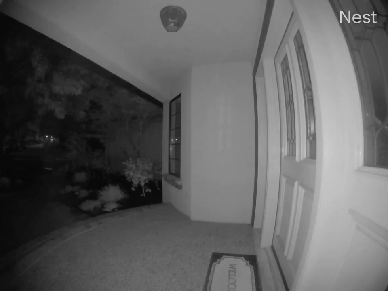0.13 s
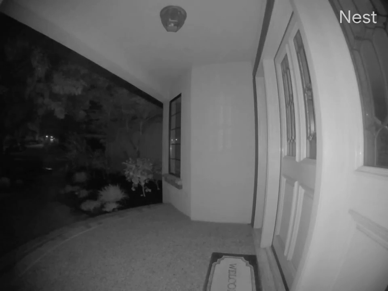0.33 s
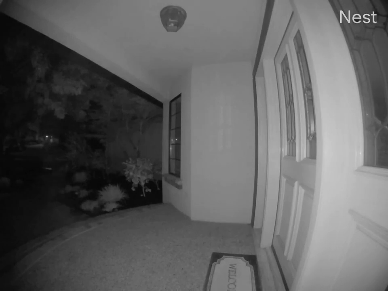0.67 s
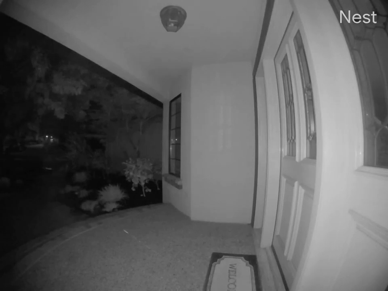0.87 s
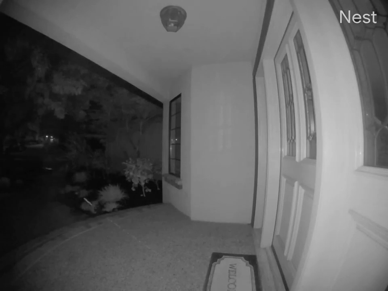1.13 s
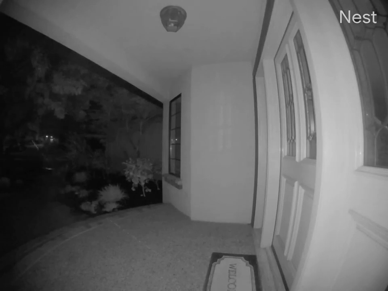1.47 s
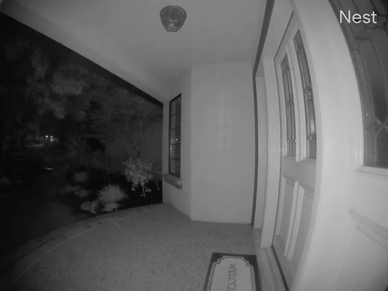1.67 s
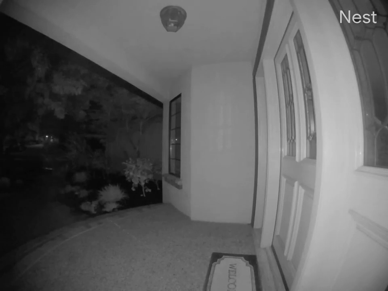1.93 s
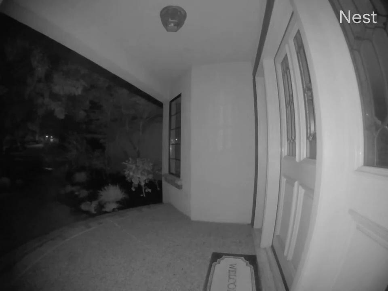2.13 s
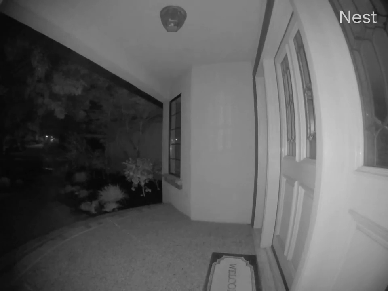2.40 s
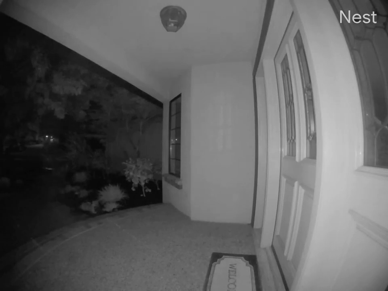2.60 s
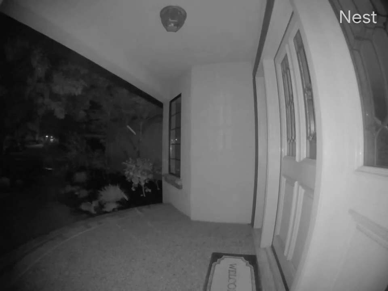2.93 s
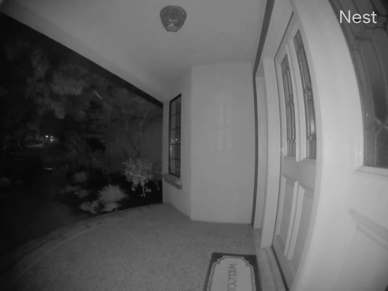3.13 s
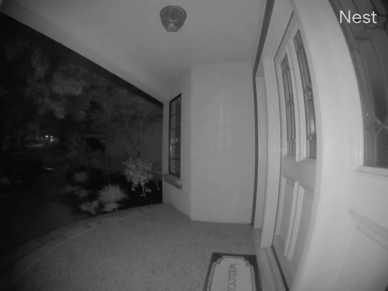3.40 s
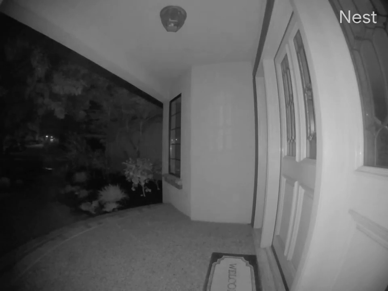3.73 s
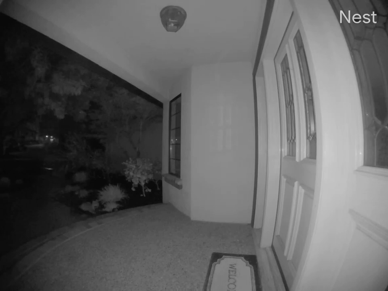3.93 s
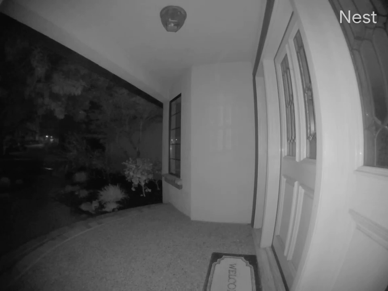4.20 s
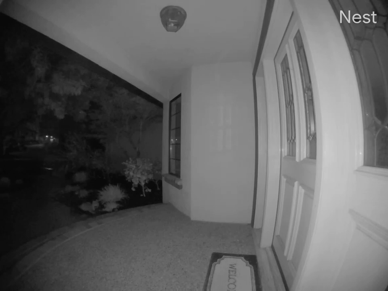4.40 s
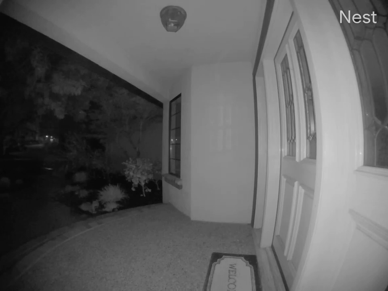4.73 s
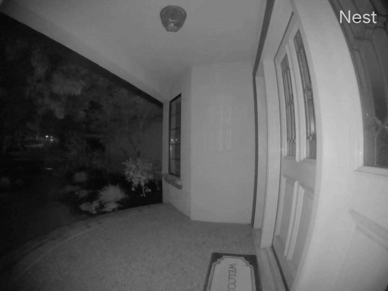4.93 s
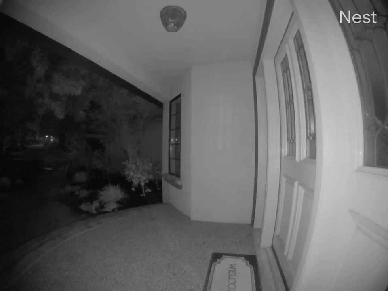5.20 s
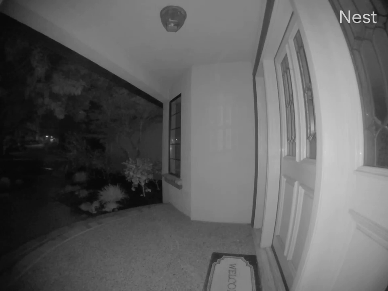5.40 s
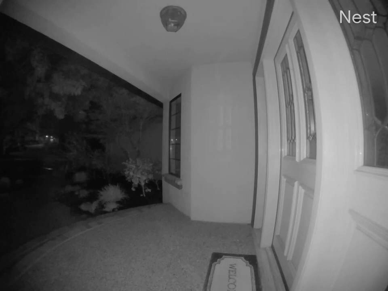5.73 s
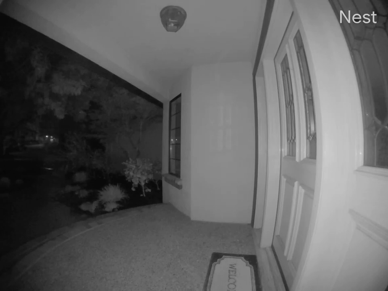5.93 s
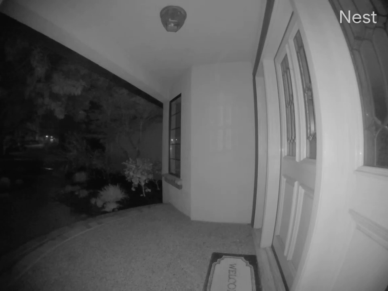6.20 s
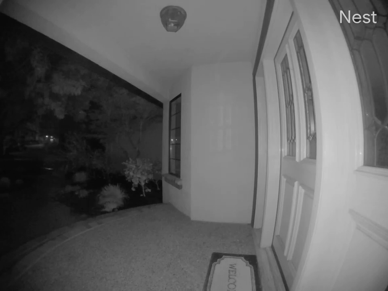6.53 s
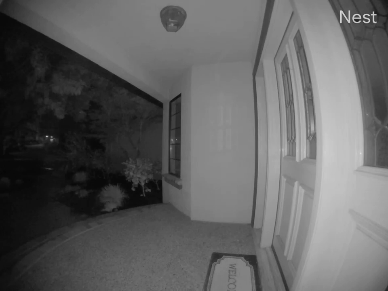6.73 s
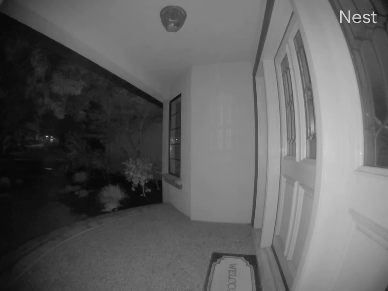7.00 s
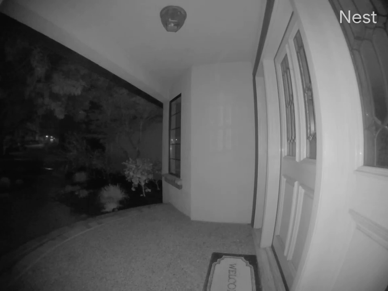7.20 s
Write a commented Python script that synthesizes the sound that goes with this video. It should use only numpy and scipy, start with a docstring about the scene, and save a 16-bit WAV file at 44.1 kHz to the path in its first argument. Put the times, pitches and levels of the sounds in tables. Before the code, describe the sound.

Two cats face off outdoors, one yowling in long arches that break into hoarse screams, the other answering lower and duller.

```python
"""Front garden at night, heard from a hard-walled porch through a narrow-band microphone.
Two cats face off: the near one yowls in long arches that break into hoarse screams, the other
answers lower and duller. Vocal folds make overtones and air puffs, throat and mouth colour them,
and the two lowest tones sound through the chest. Faint murmurs, ticks, hisses and a spit sit over
a low background rumble, and the porch adds a short echo to the cats."""
import sys
import numpy as np
from scipy import signal
from scipy.io import wavfile
from scipy.ndimage import uniform_filter1d, map_coordinates

SR = 44100
rng = np.random.default_rng(int(sys.argv[2]) if len(sys.argv) > 2 else 0)


def to_wav(s):
    """Save 16-bit WAV."""
    ch = np.atleast_2d(s).T  # columns
    pcm = np.round(np.clip(ch, -1, 1) * 32767)  # PCM
    wavfile.write(sys.argv[1], SR, pcm.astype(np.int16))


N = 324135

# near cat, one list per call: (time [s], effort [dB], pitch [Hz], mouth opening [0-1])
NEAR_CALLS = [
    [(0.0, -21, 554, 1), (0.06, -21, 538.4, 0.77), (0.105, -17.5, 555.3, 0.9), (0.2, -25, 517.3, 0.47),
     (0.29, -21.5, 542, 0.56), (0.376, -21.5, 556, 0.9), (0.46, -20.5, 534.7, 0.83), (0.54, -49, 573, 0.5)],
    [(0.86, -61.5, 344, 0.6), (0.954, -38, 333.7, 0.48), (1.08, -36, 436.2, 0.8), (1.268, -27.5, 476, 0.85),
     (1.36, -30, 483.4, 0.61), (1.658, -28, 498.5, 0.51), (1.71, -23, 474.4, 0.86),
     (1.754, -32.5, 463, 0.95), (1.76, -19, 465.4, 1), (1.783, -26.5, 480, 0.67),
     (1.797, -21.5, 512.2, 0.68), (1.845, -21.5, 506.7, 0.61), (1.865, -24.5, 487, 0.63),
     (1.904, -21.5, 482, 0.97), (1.964, -21.5, 476.6, 0.82), (2.076, -25.5, 457.8, 0.61),
     (2.152, -29, 422, 0.8), (2.21, -31, 380.6, 0.4), (2.33, -77.5, 326.5, 0)],
    [(3.05, -70.5, 351, .6), (3.098, -50.5, 379, 0.97), (3.262, -41, 421, 1), (3.384, -35.5, 437, 0.58),
     (3.544, -34, 445.2, 0.85), (3.766, -33.5, 462.5, 0.66), (3.82, -35, 455.8, 0.62),
     (4.126, -26, 470.4, 0.78), (4.214, -27, 464.3, 0.67), (4.238, -37, 459.3, 0.7), (4.268, -29, 460, 0.7),
     (4.344, -29, 442.2, 0.72), (4.432, -28.5, 423.3, 0.8), (4.46, -29, 400.4, 0.48),
     (4.49, -28.5, 360, 0.65), (4.55, -27, 329, 0.52), (4.606, -43, 285, 0.09), (4.68, -83.5, 256, 0)],
    [(4.99, -83, 340, 0.5), (5.016, -44.5, 348.4, 1), (5.084, -40.5, 405, 0.97), (5.186, -36.5, 451, 0.6),
     (5.354, -21, 549.6, 0.97), (5.44, -18, 601.7, 0.82), (5.5, -21, 605.6, 0.7), (5.61, -19, 599.4, 0.9),
     (5.908, -21.5, 616.4, 0.83), (5.984, -16, 604, 0.96), (6.02, -26.5, 602.4, 0.9),
     (6.08, -55, 618, 0.58)],
]
# other cat, one list per call: (time [s], effort [dB], pitch [Hz], mouth opening [0-1])
OTHER_CALLS = [
    [(6.325, -69, 327, 0.27), (6.345, -38.5, 331.4, 0.11), (6.418, -23, 351.8, 0.74),
     (6.516, -28, 400, 0.97), (6.62, -32.5, 394.7, 0.91), (6.66, -31, 405.7, 0.29),
     (6.69, -33.5, 406.4, 0.42), (6.71, -29.5, 404.7, 0.31), (6.735, -33.5, 404.7, 0.54),
     (6.776, -37.5, 342, 0.26), (6.8, -44, 338, 0.77)],
    [(6.8, -48, 334, 0.74), (6.83, -41.5, 323.4, 0.66), (6.876, -39.5, 339.5, 0.18), (6.9, -37, 335, 0.46),
     (6.92, -52, 319, 0.75), (6.96, -58, 308, 0.21)],
    [(7.27, -106, 305, 0.33), (7.302, -50, 305, 0.96), (7.35, -37.5, 319, 0.53)],
]
# second harmonic with clear folds, per near call: (level re effort [dB])
NEAR_SECOND_DB = [-10.5, -12, -9, -12.5]
# state of the vocal folds: (time [s], hoarseness [0-1])
HOARSENESS = [(0, .45), (.05, .45), (.09, .8), (.18, .75), (.33, .75), (.43, .8), (.52, .95), (.88, .7),
              (1.06, .35), (1.2, .08), (1.45, .04), (1.64, .03), (1.69, .45), (1.76, .25), (1.8, .18),
              (2.0, .22), (2.1, .3), (2.16, .55), (2.21, .8), (3.1, .6), (3.27, .05), (3.36, .006),
              (3.62, .004), (3.72, .18), (3.87, .15), (3.95, .1), (4.05, .22), (4.22, .2), (4.3, .45),
              (4.36, .35), (4.45, .45), (4.5, .85), (5.02, .55), (5.42, .55), (5.52, .9), (6.0, .9),
              (6.35, .65), (6.45, .88), (6.7, .75), (6.79, .7), (6.84, .45), (6.9, .45), (6.94, .8),
              (7.35, .45)]
# mouth and porch colour, near cat: (frequency [Hz], gain [dB])
NEAR_COLOUR = [(150, -21.5), (450, -10), (900, -6.5), (1400, -10), (1900, -12.5), (2350, -10.5),
               (2750, -9.5), (3400, -12), (4100, -15), (4800, -17.5), (6400, -19), (7400, -22)]
# mouth and porch colour, other cat: (frequency [Hz], gain [dB])
OTHER_COLOUR = [(150, -21), (350, 5), (550, 2), (1000, 0), (1350, 0), (2000, 1), (2600, -3.5), (3800, -11),
                (7400, -31)]
# brightness of the voices: (time [s], tilt [dB/octave])
VOICE_TILT = [(0, 7.5), (.2, -1), (.42, 2), (.54, -7.5), (.9, 1), (1.27, -2), (1.65, 5.5), (1.9, 3.5),
              (2.2, 1), (2.33, -4), (3.1, -1), (3.4, -4), (4.1, 8), (4.5, 0.5), (4.68, 0), (5.02, -0.5),
              (5.4, 6.5), (5.55, 0), (5.98, 3), (6.1, -18), (6.3, -2), (7.35, 4.5)]
# main throat resonance: (time [s], centre [Hz], gain [dB])
THROAT_RING = [(0, 2630, 11), (.06, 2640, -1.5), (.1, 2440, 14), (.17, 2250, 9), (.26, 2130, 13),
               (.31, 2670, 7), (0.4, 2870, 8.5), (0.449, 2020, 5), (1.0, 2260, 12.5), (1.3, 2440, 13.5),
               (1.5, 2450, 13.5), (1.701, 2400, 9.5), (1.77, 2340, 11.5), (1.82, 2059, 15),
               (1.9, 2420, 14.5), (2.051, 2350, 9), (2.201, 2397, 14), (3.07, 2040, 10.5), (3.2, 2480, 9),
               (3.3, 2310, 0), (3.4, 2267, 5.5), (3.9, 2340, 3), (4.17, 2330, 12.5), (4.3, 2250, 12),
               (4.421, 2170, 1), (4.479, 2250, 15.5), (4.56, 2304, 17.5), (4.621, 2279, 7.5),
               (5.35, 2627, 0.5), (5.45, 2387, 11.5), (5.501, 2200, 13.5), (5.6, 2430, 13.5),
               (5.72, 2310, 7.5), (5.85, 2300, 9), (5.96, 2240, 20), (6.02, 2170, 9), (6.1, 2195, -1),
               (6.3, 1650, 12), (6.41, 1670, 13), (6.49, 1676, 13.5), (6.6, 1620, 3.5), (6.71, 1694, 17.5),
               (6.78, 1685, 11), (6.88, 1680, 22.5), (6.939, 1670, 0.5), (7.3, 1560, 12)]
# upper throat: (time [s], upper ring gain [dB], hollow gain [dB], treble shelf gain [dB])
UPPER_THROAT = [(0, -3, 1, -6), (0.499, 1, -7.5, -2.5), (0.999, 0.5, -6, 5.5), (1.4, -1.5, -6, -1),
                (1.7, 3, -10.5, -6.5), (1.8, 12, -9.5, 1), (1.951, 8, -7.5, -2.5), (2.2, 0, 8.5, -4.5),
                (3.199, 8, -2, 1), (3.6, 1.5, -5, 2.5), (3.9, -1, -16, -7.5), (4.0, -6, -18, -14.5),
                (4.15, -6, -22, -16), (4.251, 16, -8, 3), (4.35, 7, 2, -2), (5.301, 6, -3.5, 2.5),
                (5.6, 7.5, -3.5, 2), (6.0, 3.5, 0.5, -3.5), (6.3, -6.5, -4, -1.5)]
# tone under the loudest scream: (time [s], pitch [Hz], level [dB])
MOAN_TONE = [(5.5, 753.5, -36), (5.595, 829, -45), (5.906, 698, -35), (6.043, 747, -39.5),
             (6.079, 740, -78.5)]
# murmurs, ticks, hisses and a spit: (time [s], level [dB], centre [Hz], width [Hz], T60 [s])
FAINT_NOISES = [(0.761, -55.5, 3520, 3000, 0.15), (2.44, -42.5, 594, 253, 0.4),
                (2.53, -45.5, 565, 242, 0.42), (2.738, -55.5, 2445, 3500, 0.21),
                (6.249, -32.5, 168.5, 79.2, 0.23), (0.549, -63, 4680, 3060, 1.3),
                (6.072, -60, 5350, 2580, 4), (6.397, -41, 5000, 1820, 0.77)]
# background rumble: (frequency [Hz], relative density [dB])
RUMBLE_SPECTRUM = [(24, -61), (40, -24), (65, -18.5), (110, -6), (173, -13.5), (252, -12.5), (300, -35),
                   (373, -6), (399, -17), (705, -19), (1250, -41.5), (7500, -58), (9750, -91),
                   (16500, -120)]
# rumble, louder during the calls and quieter between them: (time [s], level [dB])
RUMBLE_LEVEL = [(0, -43), (.63, -52.5), (1.41, -44.5), (2.17, -41.5), (2.6, -54.5), (3.05, -53.5),
                (4.131, -42.5), (4.83, -56.5), (5.4, -45), (5.7, -48.5), (6.0, -47.5), (6.899, -50.5),
                (7.35, -57)]


def cat_call(rows, colour, second_db, ring_width_hz):
    """Folds drive the throat, hoarseness trades overtones for rasp. Returns (start [s], sound)."""
    start_s = rows[0][0]
    t = np.arange(start_s, rows[-1][0], 1 / SR)
    effort_db, pitch_hz, opening = curves(rows, t)
    hoarse, = curves(HOARSENESS, t)
    first_gain, second_gain = chest_gains(opening, hoarse, second_db)
    jitter = (.0015 + .065 * hoarse ** 3) * wander(len(t), 120)  # hoarse folds lose the beat
    cycles = np.cumsum(pitch_hz * (1 + jitter)) / SR
    tones = np.sqrt(1 - hoarse) * fold_overtones(pitch_hz, cycles, hoarse)
    noise = np.sqrt(hoarse) * gain_of(3) * rasp(pitch_hz, cycles)
    voice = throat(tones + noise, t, pitch_hz, hoarse, colour, ring_width_hz)
    chest = first_gain * np.cos(2 * np.pi * cycles) + second_gain * np.cos(4 * np.pi * cycles)
    fade = signal.windows.tukey(len(t), min(1, 600 / len(t)))
    return start_s, gain_of(effort_db) * (voice + np.sqrt(2) * chest) * fade


def fold_overtones(pitch_hz, cycles, hoarse):
    """Harmonics 3-23 of the folds; hoarseness drowns the high ones first."""
    tones = np.zeros(len(cycles))
    for k in range(3, 24):
        waver_db = (2.2 + .12 * k) * wander(len(cycles), 16)
        rolloff_db = max(k - 5, 0) * (7 * hoarse + .5)
        harmonic = np.cos(2 * np.pi * (k * cycles + rng.random()))
        tones += gain_of(waver_db - rolloff_db) * (k * pitch_hz < 9000) * harmonic
    alternation = 1 + .5 * hoarse * np.cos(np.pi * cycles)  # every other pulse weaker: subharmonics
    return unit_rms(levelled(tones) * alternation)


def rasp(pitch_hz, cycles, delay_pulses=3, feedback=.7, steps_per_pulse=80):
    """Pulsed noise with a pitch-following comb: a gritty, metallic rasp."""
    n = len(cycles)
    steps = np.cumsum(pitch_hz) / SR * steps_per_pulse
    comb = np.r_[1, np.zeros(delay_pulses * steps_per_pulse - 1), -feedback]
    combed = signal.lfilter([1], comb, rng.standard_normal(int(steps[-1]) + 2))
    pulses = .12 + np.exp(-(cycles % 1) / .039)
    puffs = pulses * gain_of(wander(n, 110)) * map_coordinates(combed, [steps], order=3)
    flicker_db = 3 * patches(n, frames=30, bins=2)
    bass_db, bass_hz = -13, 503
    puffs = coloured(puffs, lambda hz, s: flicker_db[:, :s.size] + bass_db / (1 + (hz / bass_hz) ** 4))
    return unit_rms(puffs)


def throat(drive, t, pitch_hz, hoarse, colour, ring_width_hz):
    """Throat and mouth resonances; a clear voice tunes the main ring to the nearest overtone."""
    free_hz, ring_db = curves(THROAT_RING, t)
    tuned_hz = uniform_filter1d(pitch_hz * np.round(free_hz / pitch_hz), size=1500)
    ring_hz = hoarse * free_hz + (1 - hoarse) * tuned_hz
    tilt_db_per_octave, = curves(VOICE_TILT, t)
    upper_db, hollow_db, shelf_db = curves(UPPER_THROAT, t)
    movement_db = 3 * patches(len(t), frames=14, bins=3)  # head turns, jaw shifts

    def shape_db(hz, frame_s):
        def framed(curve):
            return np.interp(t[0] + frame_s, t, curve)

        return (spectrum_db(colour, hz)
                + movement_db[:, :frame_s.size] * np.sqrt((hz + 500) / 3000)
                + framed(tilt_db_per_octave) * np.log2((hz + 100) / 2400)
                + framed(ring_db) * bell(hz, framed(ring_hz), ring_width_hz)
                + framed(upper_db) * bell(hz, centre_hz=3900, width_hz=500)
                + framed(hollow_db) * bell(hz, centre_hz=2800, width_hz=180)
                + framed(shelf_db) * (1 + np.tanh((hz - 4480) / 120)) / 2)

    return levelled(coloured(drive, shape_db))


def chest_gains(opening, hoarse, second_db, shut_db=10.5, open_db=-35):
    """Two lowest tones, re effort: an open mouth weakens the first, hoarseness the second."""
    levels_db = shut_db + (open_db - shut_db) * opening, second_db - 11.5 * hoarse ** 2
    waver_db = 2.5 * np.sqrt(hoarse)
    return [gain_of(db + waver_db * wander(len(hoarse), 11)) for db in levels_db]


def moan():
    """One unsteady tone. Returns (start [s], sound)."""
    start_s = MOAN_TONE[0][0]
    t = np.arange(start_s, MOAN_TONE[-1][0], 1 / SR)
    pitch_hz, level_db = curves(MOAN_TONE, t)
    cycles = np.cumsum(pitch_hz * (1 + .035 * wander(len(t), 50))) / SR
    tone = np.sqrt(2) * np.cos(2 * np.pi * cycles)
    return start_s, gain_of(level_db) * tone * signal.windows.tukey(len(t), .1)


def faint_noises(attack_s=.019, release_s=.023):
    """Short faint murmurs, ticks, hisses and a spit: decaying band noise."""
    mix = np.zeros(N)
    t = np.arange(SR // 4) / SR
    fade = np.minimum(t / attack_s, 1) * np.minimum((t[-1] - t) / release_s, 1)
    for start_s, level_db, centre_hz, width_hz, t60_s in FAINT_NOISES:
        noise = rng.standard_normal(len(t))
        puff = coloured(noise, lambda hz, s: -12 * np.minimum(((hz - centre_hz) / width_hz) ** 2, 6))
        add(mix, start_s, unit_rms(puff) * gain_of(level_db - 60 * t / t60_s) * fade)
    return mix


def background_rumble():
    """Low patchy noise, louder during the calls and quieter between them."""
    flicker_db = 3.4 * patches(N, frames=12, bins=3)
    noise = rng.standard_normal(N)
    rumble = coloured(noise, lambda hz, s: spectrum_db(RUMBLE_SPECTRUM, hz) + flicker_db[:, :s.size])
    level_db, = curves(RUMBLE_LEVEL, np.arange(N) / SR)
    return unit_rms(rumble) * gain_of(level_db)


def porch_echo(x, echo_db=-8, porch_t60_s=.16, street_re_porch_db=-48, street_t60_s=1):
    """Sparse reflections: quick decay off the porch walls, faint slow one off houses opposite."""
    taps = np.zeros(SR)
    slots = np.arange(200, len(taps) - 20, 20)
    walls = gain_of(-60 * slots / SR / porch_t60_s)
    houses = gain_of(street_re_porch_db - 60 * slots / SR / street_t60_s)
    signs = rng.choice([-1., 1.], len(slots))
    taps[slots + rng.integers(0, 20, len(slots))] = signs * (walls + houses)
    return gain_of(echo_db) * signal.fftconvolve(x, taps / np.linalg.norm(taps))[:N]


def gain_of(db):
    return 10 ** (np.asarray(db) / 20)


def unit_rms(x):
    return x / np.sqrt(np.mean(x ** 2) + 1e-20)


def levelled(x):
    """Holds the running rms near 1."""
    return x / np.sqrt(uniform_filter1d(x ** 2, size=3000) + 1e-12)


def bell(hz, centre_hz, width_hz):
    return 1 / (1 + ((hz - centre_hz) / width_hz) ** 2)


def curves(table, t):
    """Value columns interpolated at times t."""
    time_s, *columns = np.transpose(table)
    return [np.interp(t, time_s, column) for column in columns]


def spectrum_db(table, hz):
    """Level interpolated along log frequency."""
    points_hz, db = np.transpose(table)
    return np.interp(np.log(hz + 1), np.log(points_hz + 1), db)


def add(mix, start_s, sound):
    part = mix[round(start_s * SR):][:len(sound)]
    part += sound[:len(part)]


def wander(n, rate_hz):
    """Smooth random curve, rms near 1."""
    steps = rng.standard_normal(int(n * rate_hz / SR) + 3)
    return map_coordinates(steps, [np.arange(n) * rate_hz / SR], order=3)


def patches(n, frames, bins):
    """Smooth random field over (frequency, time), rms 1."""
    field = rng.standard_normal((n // 128 + 9, 257))
    field = uniform_filter1d(field, size=frames, axis=0)
    return unit_rms(uniform_filter1d(field, size=bins, axis=1)).T


def coloured(x, shape_db):
    """Filters x by shape_db(frequency [Hz], time [s])."""
    hz, frame_s, spectra = signal.stft(x, SR, nperseg=512, noverlap=384)
    shaped = spectra * gain_of(shape_db(hz[:, None], frame_s[None]))
    return signal.istft(shaped, SR, nperseg=512, noverlap=384)[1][:len(x)]


def scene():
    """Both cats and their echo over rumble and faint noises, mono."""
    cats = np.zeros(N)
    for rows, second_db in zip(NEAR_CALLS, NEAR_SECOND_DB):
        add(cats, *cat_call(rows, NEAR_COLOUR, second_db, ring_width_hz=200))
    for rows in OTHER_CALLS:
        add(cats, *cat_call(rows, OTHER_COLOUR, second_db=-18, ring_width_hz=85))
    add(cats, *moan())
    return (cats + porch_echo(cats) + background_rumble() + faint_noises())[None]


def record(dry, low_cut_hz=102, treble_cut_hz=7400, leak_db=-25, band_limit_hz=8920):
    """Narrow microphone: bass cut, steep treble cut with a slight leak, band limit."""
    low_cut = signal.sosfilt(signal.butter(8, low_cut_hz, "high", fs=SR, output="sos"), dry)
    treble_fir = signal.firwin(401, treble_cut_hz, window=("kaiser", 7), fs=SR)
    limit_fir = signal.firwin(511, band_limit_hz, window=("kaiser", 9), fs=SR)
    leaky = signal.oaconvolve(low_cut, treble_fir[None], "same") + gain_of(leak_db) * low_cut
    return signal.oaconvolve(leaky, limit_fir[None], "same")


dry = scene()
out = record(dry)
to_wav(out)
```